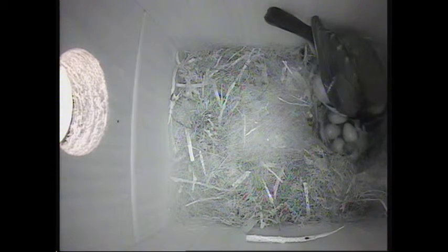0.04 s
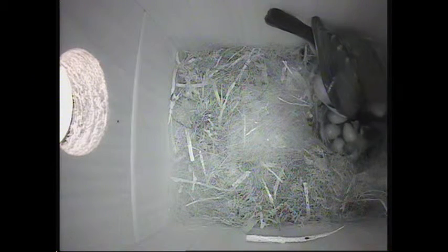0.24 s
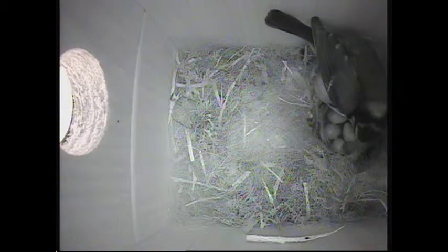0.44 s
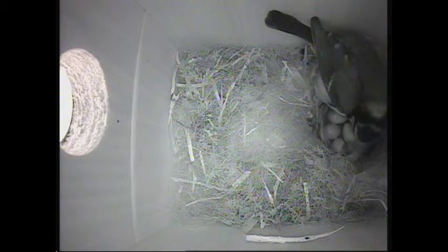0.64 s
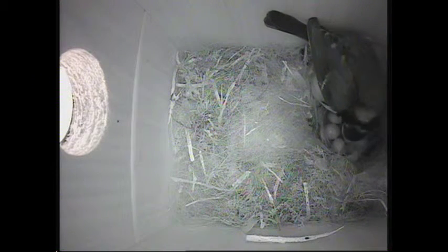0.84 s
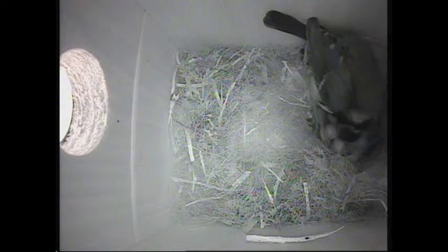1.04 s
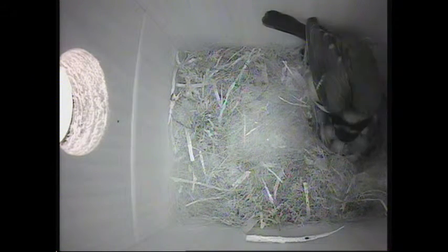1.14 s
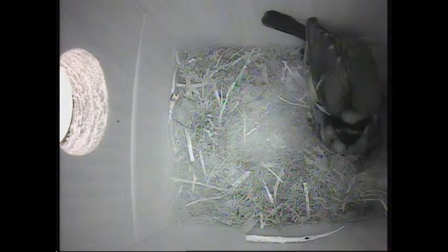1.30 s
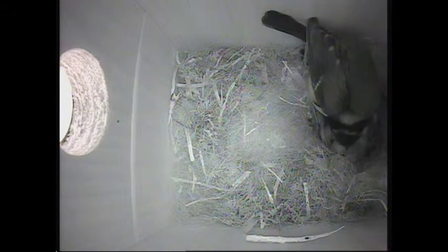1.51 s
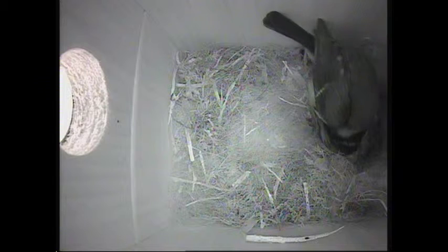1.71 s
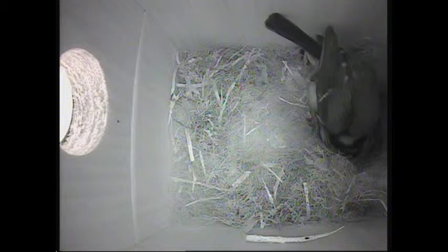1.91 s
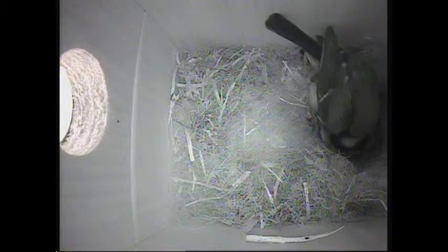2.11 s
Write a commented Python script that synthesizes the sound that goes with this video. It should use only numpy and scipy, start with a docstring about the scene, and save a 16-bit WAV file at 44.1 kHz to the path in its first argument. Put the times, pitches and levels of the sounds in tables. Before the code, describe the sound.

A bird gives six harsh chatter notes close up, over hum and faint birdsong.

```python
"""Inside a wooden nest box, close to a small camera's microphone. A bird on its eggs gives six harsh
chatter notes, slowing down: bursts of fluttering air with ringing peaks, which electrical interference
repeats up the spectrum. A songbird sings faintly outside, over rumble, hiss and one brief drone.
The camera's wiring adds mains buzz and a thin whine, and chops the song so that it is mirrored
up and down in pitch. Nearly all sound is in the left channel."""
import sys
import numpy as np
from scipy import signal
from scipy.fft import rfft, irfft
from scipy.io import wavfile

SR = 44100
rng = np.random.default_rng(int(sys.argv[2]) if len(sys.argv) > 2 else 0)


def persist_wave(psi):
    """Save psi, clipped to +-1, as 16-bit WAV."""
    counts = np.round(np.clip(psi, -1, 1) * 32767).astype(np.int16)
    wavfile.write(sys.argv[1], SR, np.atleast_2d(counts).T)


N = 94815


def amp(db):
    return 10 ** (np.asarray(db) / 20)


def unit(x):
    return x / np.sqrt(np.mean(x ** 2) + 1e-20)


def add(mix, start_s, sound):
    """Mixes a sound in at its start time."""
    at = round(start_s * SR)
    sound = sound[max(-at, 0):]
    part = mix[max(at, 0):][:len(sound)]
    part += sound[:len(part)]


def colour(x, curve, rings=(), notches=(), size=4096):
    """EQ of unit power, so its levels are relative: a broad curve with resonances and notches."""
    hz = np.fft.rfftfreq(size, 1 / SR)
    curve_hz, curve_db = np.transpose(curve)
    power = amp(np.interp(np.log(hz + 1), np.log(curve_hz), curve_db)) ** 2
    for centre, width, ring_db in rings:
        power += amp(ring_db) ** 2 / (1 + ((hz - centre) / width) ** 2) ** 2
    for centre, width, dip_db in notches:
        power *= amp(dip_db * np.exp(-((hz - centre) / width) ** 2)) ** 2
    # minimum phase: the ringing follows the attack
    cepstrum = irfft(np.log(power + 1e-12))
    cepstrum[0] /= 2
    taps = irfft(np.exp(rfft(cepstrum[:size // 2], size)))
    return signal.fftconvolve(x, taps / np.linalg.norm(taps))[:len(x)]


def wander(count, rate_hz):
    """Smooth random modulation up to about the given rate."""
    rolloff = np.exp(-(np.fft.rfftfreq(N, 1 / SR) / rate_hz) ** 2)
    return unit(irfft(rfft(rng.standard_normal(N)) * rolloff, N))[:count]


def reverb(x, t60_s):
    """A diffuse, dying tail."""
    t = np.arange(SR // 2) / SR
    tail = rng.standard_normal(len(t)) * amp(-60 * t / t60_s)
    return signal.fftconvolve(x, tail / np.linalg.norm(tail))[:N]


# EQ of the low bed (frequency [Hz], level [dB])
RUMBLE_EQ = [(20, -14.5), (60, -25), (100, 0), (135, 4.5), (175, -4), (230, -16.5), (400, -27), (1000, -54)]
# EQ of a steady hiss, cut off steeply above 14 kHz (frequency [Hz], level [dB])
HISS_EQ = [(100, 2), (500, -0.5), (900, -3.5), (1500, -7), (2200, -5.5), (2700, -15.5), (3600, -12.5),
           (5000, -16.5), (7000, -20), (11000, -22), (12500, -13.5), (13600, -21), (14300, -57),
           (16000, -53)]
# whining peaks in the hiss (frequency [Hz], width [Hz], level [dB])
WHINE_PEAKS = [(1905, 130, 1), (3850, 320, -7.5), (5850, 110, -4), (7750, 390, -11), (9840, 150, -14),
               (10800, 120, -34), (13500, 130, -12)]


def noise_bed():
    """Low rumble, and hiss with a fuzzy electrical whine."""
    low, high = rng.standard_normal((2, N))
    return amp(-40) * colour(low, RUMBLE_EQ) + amp(-51.5) * colour(high, HISS_EQ, WHINE_PEAKS)


def whine():
    """The core of the electrical whine: even in level, jittery in pitch."""
    hz = 1976 + 50.1 * wander(N, rate_hz=110.3)
    return amp(-53) * np.sin(2 * np.pi * np.cumsum(hz) / SR)


# the drone's fade in and out (time [s], level [dB])
DRONE_FADE = [(1.0, -70), (1.2, -45), (1.3, -32.5), (1.4, -45.5), (1.5, -51), (1.65, -78)]


def drone():
    """A low, wavering drone swells once and sinks back into the rumble."""
    level_db = np.interp(np.arange(N) / SR, *np.transpose(DRONE_FADE))
    hz = 140 + 5 * wander(N, rate_hz=12.6)
    return amp(level_db) * np.sin(2 * np.pi * np.cumsum(hz) / SR)


# two kicks in each mains cycle (delay [s], polarity [+/-1], rise [s], decay [s], gain [dB])
MAINS_KICKS = [(.0063, -1, 0.0025, 0.0027, -21.5), (0.0142, 1, 0.00045, 0.0037, -26.5)]


def mains_buzz(mains_hz=50, spit_decay_s=0.00073):
    """Each mains cycle kicks the signal down, then up, each time with a tiny spit of noise."""
    t = np.arange(N) / SR
    hum, spit = np.zeros((2, N))
    for delay, polarity, rise, decay, db in MAINS_KICKS:
        age = (t - delay) % (1 / mains_hz)
        hum += polarity * amp(db) * (1 - np.exp(-age / rise)) * np.exp(-age / decay)
        spit += np.exp(-age / spit_decay_s)
    return hum - hum.mean() + amp(-41.5) * colour(spit * rng.standard_normal(N), HISS_EQ)


# EQ of the breath in rough song notes (frequency [Hz], level [dB])
BREATH_EQ = [(300, 2), (900, -2.5), (1800, -1.5), (3000, -14), (5500, -7.5), (7500, -22), (9500, -9),
             (13500, -20), (16000, -38)]
# the distant song's notes
# (time [s], length [s], first pitch [Hz], middle pitch [Hz], last pitch [Hz], gain [dB], roughness [0-1])
SONG_NOTES = [(-.03, 0.11, 2750, 2607, 2356, -44.5, 0.18), (0.085, 0.089, 2440, 2400, 2270, -57.5, 0.14),
              (0.051, .04, 3760, 4540, 4500, -52, 0), (0.598, 0.028, 4150, 4200, 4500, -48.5, 0.33),
              (0.643, 0.083, 4100, 3890, 3840, -53, 0.92), (0.752, 0.059, 3800, 4205, 4000, -56, 0.77),
              (0.929, 0.05, 4750, 4484, 4420, -48.5, 0.31), (0.999, 0.13, 4210, 4460, 5175, -55, 0.71),
              (1.107, .064, 5450, 6510, 5700, -51, .35), (1.202, 0.067, 4600, 5470, 5700, -50.5, 0.56),
              (1.277, 0.1, 4480, 4630, 4500, -59, 0.62), (1.404, 0.028, 4340, 4530, 4480, -50.5, 0.41),
              (1.462, 0.11, 4300, 4660, 5085, -53.5, 0.5), (1.546, 0.063, 5500, 6510, 5700, -49.5, .35),
              (1.589, 0.038, 4870, 4650, 4360, -51.5, 0.53), (1.647, 0.059, 4400, 5280, 5330, -49.5, 0.61)]


def songbird(spread_hz=322, fade_s=0.009):
    """Gliding whistles, the rough ones buzzy and breathy, blurred by the outdoors."""
    song = np.zeros(N)
    for start, length, first, middle, last, db, rough in SONG_NOTES:
        t = np.arange(0, length, 1 / SR)
        glide = np.polyfit([0, 0.5, 1], [first, middle, last], 2)
        hz = np.polyval(glide, t / length) + rough * spread_hz * wander(len(t), rate_hz=363)
        whistle = np.sin(2 * np.pi * np.cumsum(hz) / SR)
        breath = rough * amp(-4) * colour(rng.standard_normal(SR // 2), BREATH_EQ)[:len(t)]
        fade = np.clip(np.minimum(t, length - t) / fade_s, 0, 1)
        add(song, start, amp(db) * fade * (whistle + breath))
    return song + amp(-7) * reverb(song, t60_s=0.34)


# sidebands around 1 to 4 times the chop rate (level against the song [dB])
SIDEBANDS_DB = [-3, -15, -16, -17]
# EQ of the chopped song (frequency [Hz], level [dB])
SONG_EQ = [(500, 2), (1300, -0.5), (2600, 3), (4500, 0), (5500, -4.5), (6500, -5), (8400, 1.5),
           (10400, 0.5), (12500, 1.5), (14400, -4.5)]


def wiring_chop(song, chop_hz=3906):
    """Fast periodic interference mirrors each whistle around multiples of its rate; an EQ follows."""
    phase = 2 * np.pi * chop_hz * np.arange(N) / SR
    chop = sum(2 * amp(db) * np.cos(k * phase) for k, db in enumerate(SIDEBANDS_DB, 1))
    return colour(song * (1 + chop), SONG_EQ)


# EQ of the rasp and of the puff of air on the microphone (frequency [Hz], level [dB])
RASP_EQ = [(60, -22), (200, -8.5), (350, -13.5), (550, -9.5), (850, -5.5), (1050, -12), (1350, -10),
           (2100, -4), (2800, -12.5), (4300, -12.5), (5100, -15), (6200, -11.5), (9200, -18),
           (11200, -21.5), (13000, -22.5), (15800, -28)]
PUFF_EQ = [(20, -4), (50, -4), (150, -4), (280, -11.5), (600, -25)]
# ringing peaks of the harsh chatter, repeated up the spectrum by electrical interference,
# and the notches between them (frequency [Hz], width [Hz], level [dB])
MAIN_RING = (1622, 52, 8.6)
LOW_RINGS = [(696, 102, -2), (1850, 370, -2), (2535, 130, -7), (3107, 190, -1), (3826, 210, -7)]
UPPER_RINGS = [(4580, 90, 0), (5600, 45, -13.5), (7170, 130, -9), (7740, 220, -14), (8464, 130, -3.5),
               (10210, 118, -8), (12360, 150, -11.5), (14030, 130, -15.5)]
NOTCHES = [(1006, 53, -8.5), (2815, 76, -6.5), (3480, 27, -6), (4960, 110, -3), (5340, 80, 0),
           (6570, 65, -17), (7370, 96, -11), (11500, 170, -16)]


def chatter_note(length, rasp_db, ring_db, upper_db, swell_db, crest, puff_db):
    """Air, fluttering irregularly, snaps on, swells and is cut off; narrow peaks make it ring."""
    flutter_hz, jitter, depth = 381.5, 0.43, 0.41
    attack_s, release_db_per_s = 0.0044, 1542
    t = np.arange(SR // 8) / SR
    cycles = np.cumsum(flutter_hz * (1 + jitter * wander(len(t), flutter_hz))) / SR
    flutter = 1 + depth * np.cos(2 * np.pi * cycles)
    air = unit(rng.standard_normal(len(t)) * flutter)
    rise_db = -swell_db * np.maximum(1 - t / (crest * length), 0)
    release_db = -release_db_per_s * np.maximum(t - length, 0)
    air *= np.minimum(t / attack_s, 1) * amp(rise_db + release_db)
    main_hz, main_width, main_db = MAIN_RING
    upper = [(hz, width, db + upper_db) for hz, width, db in UPPER_RINGS]
    rings = [(main_hz, main_width, main_db + ring_db), *LOW_RINGS, *upper]
    rasp = amp(rasp_db) * colour(air, RASP_EQ, rings, NOTCHES)
    return rasp + amp(puff_db) * colour(air, PUFF_EQ)


# chatter cues (time [s], length to release [s], rasp level [dB], main ring boost [dB],
# upper rings boost [dB], swell [dB], crest position [share of length], puff level [dB])
CHATTER_CUES = [(0.2199, 0.021, -9.5, -3.5, 3, 9, 0.74, -28),
                (.272, 0.024, -10.5, 0.5, -5.5, 5.5, 0.52, -23),
                (.326, 0.026, -11.5, -5, -3, 9.5, 0.5, -28.5), (.386, 0.031, -11, -5, -3, 8.5, .85, -27.5),
                (.454, 0.031, -9.5, 0.5, -2.5, 9, 0.74, -24.5), (.542, 0.035, -9, -7, 0.5, 9, .9, -28.5)]


def nesting_bird():
    """The close-up chatter and its short tail in the wooden box."""
    chatter = np.zeros(N)
    for start, *note in CHATTER_CUES:
        add(chatter, start, chatter_note(*note))
    return chatter + amp(-39) * reverb(chatter, t60_s=0.3)


def scene():
    """The mix sits hard left; the right carries a trace of bleed and its own faint rumble."""
    left = nesting_bird() + wiring_chop(songbird()) + mains_buzz() + noise_bed() + drone() + whine()
    right = amp(-71) * left + amp(-85.5) * colour(rng.standard_normal(N), RUMBLE_EQ)
    return np.array([left, right])


def record(dry, cutoff_hz=15900):
    """A hard ceiling at full scale, then a steep low-pass."""
    lowpass = signal.firwin(511, cutoff_hz, window=("kaiser", 9), fs=SR)
    return signal.oaconvolve(np.clip(dry, -1, 1), lowpass[None], "same")


dry = scene()
out = record(dry)
persist_wave(out)
```